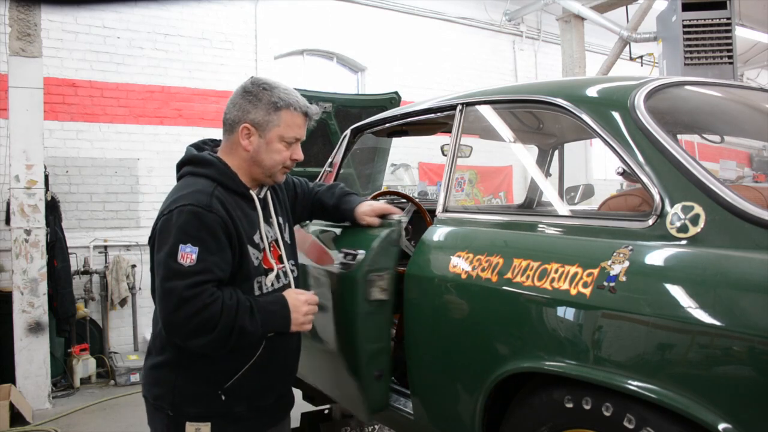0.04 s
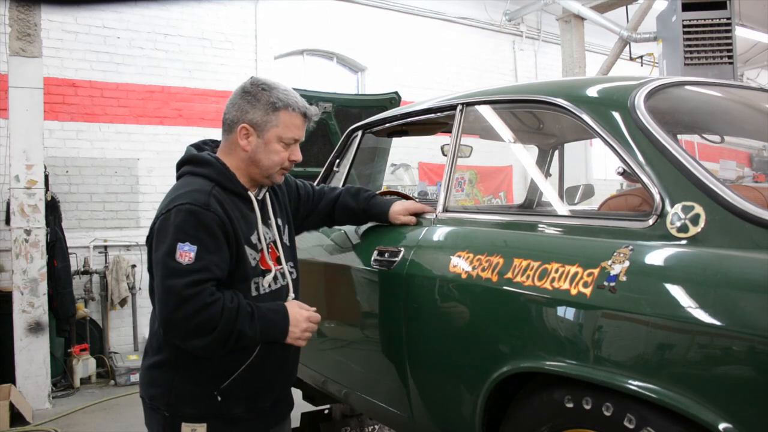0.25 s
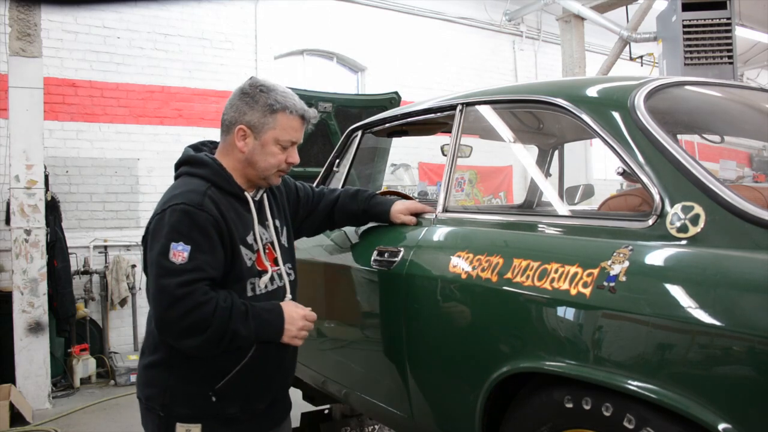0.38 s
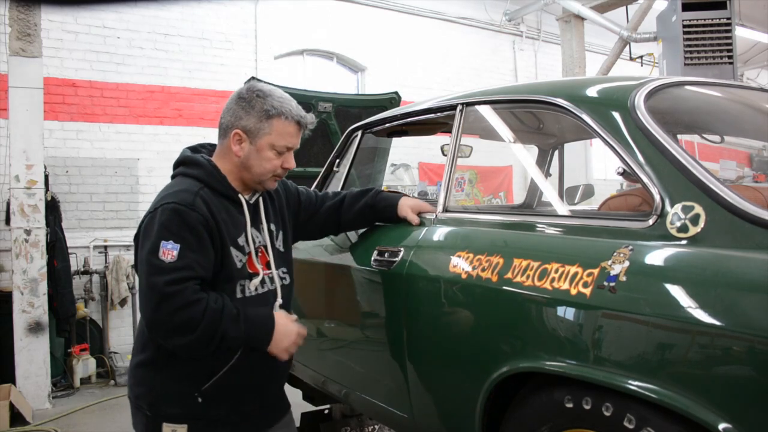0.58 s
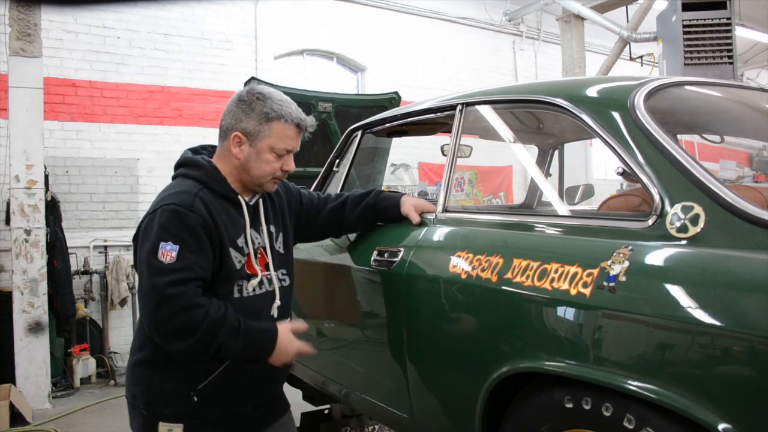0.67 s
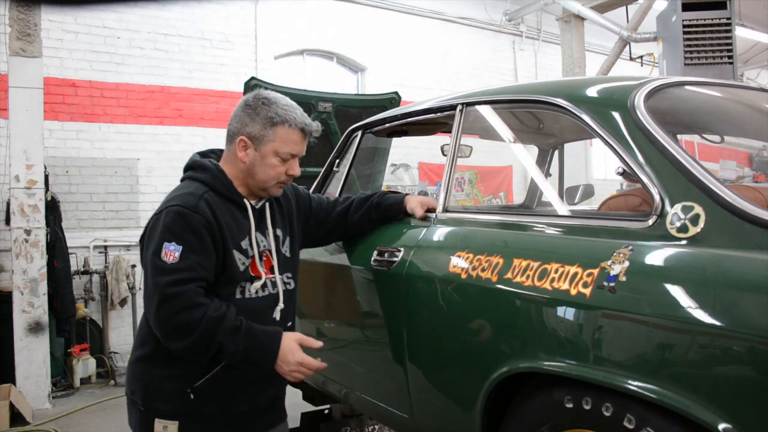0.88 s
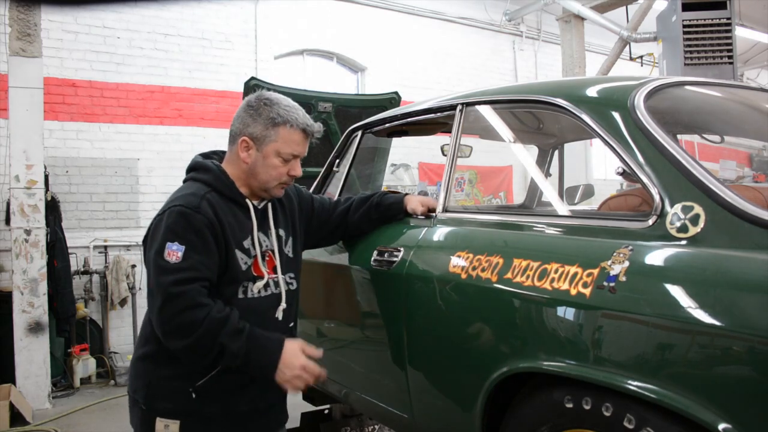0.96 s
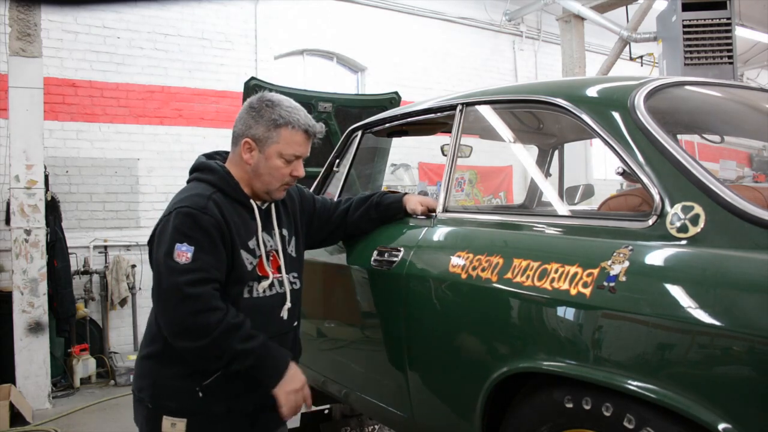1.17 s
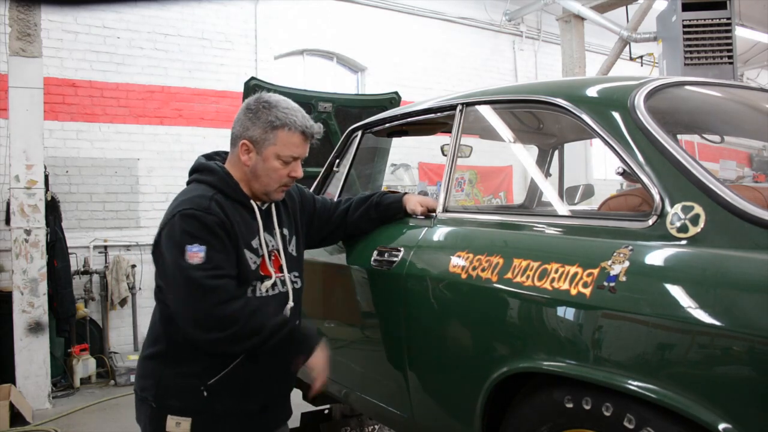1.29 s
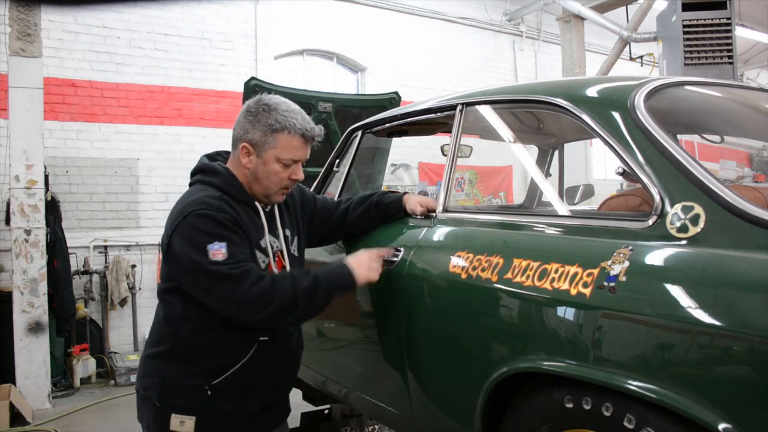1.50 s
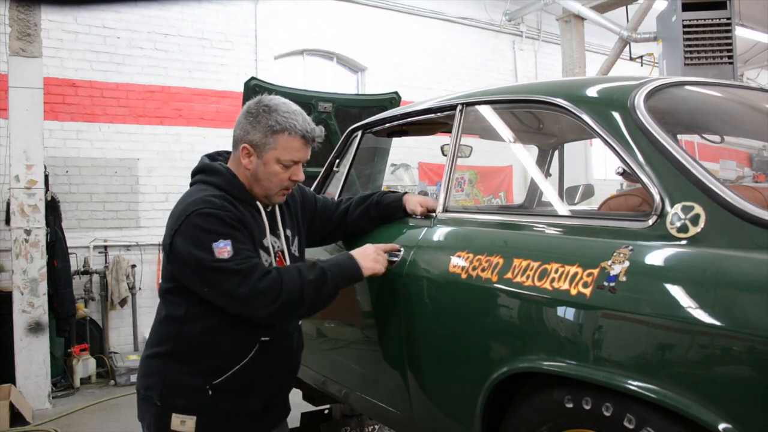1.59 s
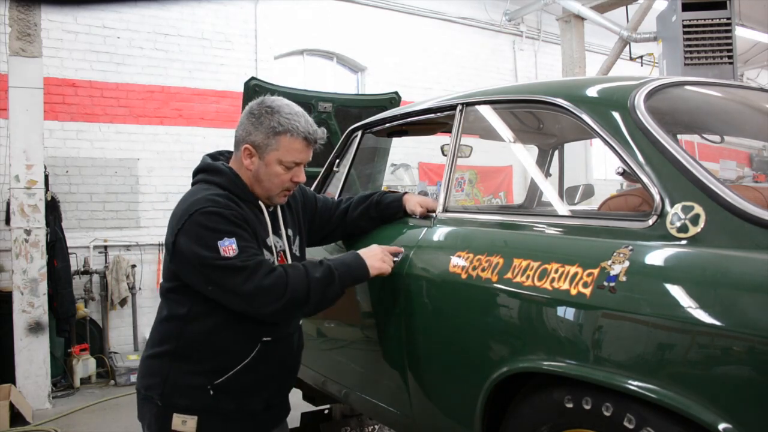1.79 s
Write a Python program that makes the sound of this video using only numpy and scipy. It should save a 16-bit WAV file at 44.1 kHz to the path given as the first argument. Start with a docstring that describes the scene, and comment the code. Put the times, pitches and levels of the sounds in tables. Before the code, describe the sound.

A heavy vintage car door slams once in a live brick workshop. A faint latch touch at 0.15 seconds, a sharp metallic crack at 0.21, then a thick, juddering sheet-metal thump with loose rattle until about 0.3. The roomy echo dies over roughly a second. Small clicks come from 0.6 to 1.4, a soft footfall near 1.1 and sleeve rustles to 1.7, over quiet air and hum.

```python
"""Car door slam in a brick workshop

An old car's steel door is slammed once: the latch touches, cracks over its striker, and the door judders in
its frame. Steel rings as decaying cosines; sheet metal, rattle and small clicks are shaped, dying noise.
The hall is a decaying stereo noise tail, and an automatic gain control ducks and recovers. Then come
small clicks, a soft footfall and a sleeve's rustle, over steady air noise and hum."""
import sys
import numpy as np
from scipy import signal
from scipy.fft import rfft, irfft, next_fast_len
from scipy.io import wavfile
from scipy.ndimage import minimum_filter1d

SR = 44100
rng = np.random.default_rng(int(sys.argv[2]) if len(sys.argv) > 2 else 0)


def file_out(sig):
    """Save sig as 16-bit WAV at sys.argv[1]."""
    # one column per channel
    cols = np.atleast_2d(sig).T
    # limit, then scale
    lim = np.clip(cols, -1, 1)
    pcm = np.round(lim * 32767).astype(np.int16)
    wavfile.write(sys.argv[1], SR, pcm)


N = 81585  # length in samples


def amp(db):
    """Decibels to gain."""
    return 10 ** (np.asarray(db) / 20)


def unit(x):
    """Scale to rms 1."""
    return x / np.sqrt(np.mean(x ** 2) + 1e-20)


def along(points, hz):
    """Read (Hz, value) points on a log frequency axis."""
    point_hz, values = np.transpose(points)
    return np.interp(np.log(hz + 1), np.log(point_hz + 1), values)


def since(start_s):
    """Seconds since start_s, zero before it."""
    return np.maximum(np.arange(N) / SR - start_s, 0)


def place(x, start_s):
    """Delay x to start at start_s."""
    delay = max(round(start_s * SR), 0)
    return np.pad(x, ((0, 0), (delay, 0)))[:, :N]


def filtered(x, response):
    """Multiply the spectrum of x by a response of frequency."""
    size = next_fast_len(N + SR // 2)
    hz = np.fft.rfftfreq(size, 1 / SR)
    return irfft(rfft(x, size) * response(hz), size)[..., :N]


def noise(spectrum, alike, tilt_db=0):
    """Stereo noise of rms 1 with a colour, a tilt in dB per octave and a left-right likeness."""
    def mid_side(hz):
        colour = amp(along(spectrum, hz) + tilt_db * np.log2(hz + 1))
        # sharing power between mid and side by this angle sets the correlation
        angle = np.arccos(np.clip(along(alike, hz), -1, 1)) / 2
        return colour * [np.cos(angle), np.sin(angle)]

    mid, side = filtered(rng.standard_normal((2, N)), mid_side)
    return unit(np.array([mid + side, mid - side]))


def fade(t, t60):
    """Exponential decay, down 60 dB after t60 seconds."""
    return np.exp(-np.log(1000) * t / t60)


def dying(x, t60s):
    """Let each frequency of x die at its own speed."""
    hz, t, bins = signal.stft(x, SR, nperseg=512)
    decay = fade(t, along(t60s, hz)[:, None])
    return signal.istft(bins * decay, SR, nperseg=512)[1][:, :N]


def ring(modes, start_s, attack_s, scatter_db=1):
    """Damped modes build up from rest, their levels scattered a little at each strike."""
    t = np.arange(N) / SR
    waves = 0
    for hz, db, t60 in modes:
        level = amp(db + scatter_db * rng.standard_normal())
        waves = waves + level * fade(t, t60) * np.cos(2 * np.pi * hz * t)
    return place(waves[None] * (1 - np.exp(-t / attack_s)), start_s)


# The workshop air at the microphone. Each row: frequency in Hz, relative level in dB per Hz.
AIR_SPECTRUM = [(25, -13), (60, -10.5), (110, -6), (180, -6.5), (260, -4.5), (400, -6), (800, -9.5),
                (1400, -15.5), (2500, -18.5), (7500, -23), (12500, -22), (16000, -26)]
# How alike the air is left and right. Each row: frequency in Hz, correlation from 0 to 1.
AIR_ALIKE = [(60, 0.4), (300, 0.2), (1500, 0.67), (10000, 0.16)]
# The hum of the shop's machines. Each row: frequency in Hz, level in dB rms.
HUM_TONES = [(59.4, -57), (241, -57.5), (786, -63.5)]


def background():
    """Steady coloured air noise, with sine tones for the hum of the shop's machines."""
    hum = 0
    for hz, db in HUM_TONES:
        phase = rng.random()  # in cycles
        hum = hum + amp(db) * np.sqrt(2) * np.sin(2 * np.pi * (hz * since(0) + phase))
    return amp(-46.5) * noise(AIR_SPECTRUM, AIR_ALIKE) + hum


# How long the brick hall rings on. Each row: frequency in Hz, t60 in seconds.
HALL_T60 = [(60, .9), (180, 1.0), (330, 1.23), (900, 1.25), (2000, 1.2), (4000, 1), (8000, 0.87),
            (15000, 0.58)]
# Colour of the hall. Each row: frequency in Hz, relative level in dB.
HALL_COLOUR = [(45, 8.5), (110, 9.5), (190, 2), (340, 3.5), (600, 1.5), (1200, 1), (2000, 1.5),
               (4000, -1.5), (7000, 1), (15000, -5.5)]
# How alike the hall is left and right. Each row: frequency in Hz, correlation from 0 to 1.
HALL_ALIKE = [(60, 0.87), (250, 0.59), (1000, 0.6), (4000, 0.15), (10000, .1)]
HALL_BUILD_S = 0.023
# the far wall sends back a soft swell, a bell curve in time
FAR_WALL_S, FAR_WALL_DB, FAR_WALL_SPREAD_S = 0.21, 2.5, 0.057


def hall(x):
    """The workshop's reverberation builds up, swells as the far wall answers, and dies slowly."""
    t = since(0)
    bell = np.exp(-((t - FAR_WALL_S) / FAR_WALL_SPREAD_S) ** 2 / 2)
    tail = dying(noise(HALL_COLOUR, HALL_ALIKE), HALL_T60)
    tail = tail * (1 - np.exp(-t / HALL_BUILD_S)) * amp(FAR_WALL_DB * bell)
    mono = x.mean(0)[None]
    return signal.fftconvolve(mono, tail / np.linalg.norm(tail), axes=1)[:, :N]


# A sleeve sweeps by. Each row: time of its peak in seconds, level in dB, half length in seconds.
SLEEVE_SWEEPS = [(0.99, -48, 0.051), (1.209, -49.5, 0.02), (1.366, -48.5, 0.054), (1.477, -55, 0.03),
                 (1.662, -47.5, .11)]
# Colour of the cloth. Each row: frequency in Hz, relative level in dB per Hz.
CLOTH_SPECTRUM = [(150, -34), (800, 3), (1600, 0.5), (2600, -0.5), (4500, -15), (12000, -23)]
# A soft footfall on the floor. Each row: frequency in Hz, level in dB, t60 in seconds.
STEP_MODES = [(89.5, 1, 0.087), (136, -4.5, 0.091), (241, 2, 0.062), (666, -7, 0.053)]
STEP_S, STEP_DB = 1.076, -29


def movement():
    """The man's sleeve is cloth noise swelling and fading; his foot is a few damped low modes."""
    t = since(0)
    sweep = 0
    for peak_s, db, half_s in SLEEVE_SWEEPS:
        sweep = sweep + amp(db) * np.exp(-((t - peak_s) / half_s) ** 2 / 2)
    rustle = sweep * noise(CLOTH_SPECTRUM, AIR_ALIKE)
    step = amp(STEP_DB) * ring(STEP_MODES, STEP_S, attack_s=0.0019)
    return rustle + step


# Small clicks at the car's side. Each row: start in seconds, level in dB,
# brightness in dB per octave, t60 in seconds.
CLICKS = [(.624, -28.5, -2.5, .05), (.855, -37, -2, 0.095), (.961, -36, -2, .1), (1.194, -52.5, 1, 0.12),
          (1.304, -42.5, -1, 0.14), (1.392, -36, 3.5, 0.068)]
# Colour of the clicks. Each row: frequency in Hz, relative level in dB per Hz.
CLICK_SPECTRUM = [(200, -4), (900, -2.5), (2000, -4), (2450, -14.5), (2900, 4), (3300, -8), (4100, -6),
                  (5000, -20), (6300, -9.5), (8000, -48), (15000, -33)]
# How alike direct sound is left and right. Each row: frequency in Hz, correlation from 0 to 1.
DIRECT_ALIKE = [(100, 0.91), (1000, 0.87), (3000, 0.89), (9000, 0.18)]


def clicks():
    """Short ticks of decaying noise with a colour peak near 3 kHz."""
    out = 0
    for start_s, db, tilt_db, t60 in CLICKS:
        tick = noise(CLICK_SPECTRUM, DIRECT_ALIKE, tilt_db) * fade(since(0), t60)
        out = out + place(amp(db) * tick, start_s)
    return out


# The latch at first touch. Each row: frequency in Hz, level in dB, t60 in seconds.
TOUCH_MODES = [(320, -5, 0.083), (505, -9, 0.062), (630, -9.5, 0.061), (1020, 0, 0.053), (1090, -6, 0.028),
               (1630, -10, 0.022)]
TOUCH_S, TOUCH_DB = 0.154, -22.5
# The latch snaps over the striker. Each row: start in seconds, level in dB.
SNAPS = [(0.208, -18), (0.21, -6), (0.2109, -26)]
# The latch steel. Each row: frequency in Hz, level in dB, t60 in seconds.
LATCH_MODES = [(1170, 0, 0.018), (1930, -20, 0.035), (2350, -1, 0.012), (3150, -3, 0.0087),
               (3480, -6, 0.014), (4180, -21, 0.015), (6400, -11.5, 0.0087), (7960, -18, 0.011),
               (10200, -19, 0.011)]
# Loose glass and linkage inside the door, a colour that the latch's crack shares.
# Each row: frequency in Hz, relative level in dB per Hz.
RATTLE_SPECTRUM = [(200, -53), (1200, 4.5), (2200, 1.5), (3600, 1.5), (4900, -5), (6600, -7), (8500, -15),
                   (15000, -30)]
CRACK_DB, CRACK_T60_S = -4, 0.0061
LATCH_HALL_DB = -4


def latch():
    """The latch rings at a soft touch, then snaps over the striker as steel modes and a noise crack."""
    touch = amp(TOUCH_DB) * ring(TOUCH_MODES, TOUCH_S, attack_s=0.0035)
    out = touch * np.ones((2, 1))  # same on both sides
    for start_s, db in SNAPS:
        crack = place(noise(RATTLE_SPECTRUM, DIRECT_ALIKE) * fade(since(0), CRACK_T60_S), start_s)
        steel = ring(LATCH_MODES, start_s, attack_s=0.00019)
        out = out + amp(db) * (steel + amp(CRACK_DB) * crack)
    return out + amp(LATCH_HALL_DB) * hall(out)


# The door lands in its frame and judders. Each row: start in seconds, sheet metal level in dB,
# rattle level in dB, panel thump level in dB.
BLOWS = [(.211, -16, -30, -17), (0.2334, -11.5, -23.5, -11.5), (.243, -6.5, -17.5, -9.5),
         (0.2514, -9.5, -19, -14), (.261, -10, -18, -15), (.279, -9.5, -21, -15)]
# Door skin and body shell. Each row: frequency in Hz, level in dB, t60 in seconds.
PANEL_MODES = [(55.9, -22, 0.74), (92, -13, 1), (150, -32, 0.55), (175.6, -8, 0.55), (223.1, -4.5, 0.2),
               (297.2, 3, 0.29), (331.2, -3, 0.23), (458, -5, 0.47), (499.3, -10, 0.47), (610, -16, 0.18),
               (904, -16, 0.66), (1250, -15, 0.25)]


def shell():
    """Every blow thumps the damped modes of the door skin and the body behind it."""
    return sum(amp(thump_db) * ring(PANEL_MODES, start_s, attack_s=0.0014)
               for start_s, _, _, thump_db in BLOWS)


# Crowded higher modes of the sheet metal. Each row: frequency in Hz, relative level in dB per Hz.
SHEET_SPECTRUM = [(20, -24), (45, -8.5), (90, -6.5), (170, -2), (320, 4.5), (450, 1.5), (800, -0.5),
                  (1300, -6), (2000, -13.5), (4000, -27.5), (15000, -41)]
# How long the sheet metal rings. Each row: frequency in Hz, t60 in seconds.
SHEET_T60 = [(60, 0.28), (400, 0.22), (1500, 0.11), (8000, 0.3)]
RATTLE_T60_S, RATTLE_GRAIN_S, RATTLE_ROUGH_DB = 0.2, 0.0022, 7
DOOR_HALL_DB = -0.5


def door():
    """Each blow shakes the sheet metal and the loose parts, and sets the hall ringing."""
    t = since(0)
    out = np.zeros((2, N))
    for start_s, sheet_db, rattle_db, _ in BLOWS:
        sheet = dying(noise(SHEET_SPECTRUM, DIRECT_ALIKE), SHEET_T60)
        sheet = sheet * (1 - np.exp(-t / 0.00033))
        # random levels, one per grain, make the rattle uneven
        grains = np.interp(t / RATTLE_GRAIN_S, np.arange(N), rng.standard_normal(N))
        chatter = unit(amp(RATTLE_ROUGH_DB * grains))
        rattle = noise(RATTLE_SPECTRUM, DIRECT_ALIKE) * chatter * fade(t, RATTLE_T60_S)
        blow = place(amp(sheet_db) * sheet + amp(rattle_db) * rattle, start_s)
        out += blow + amp(DOOR_HALL_DB) * hall(blow)
    return out


LATCH_PAN_DB = -2  # left minus right, for the latch and the clicks beside it
CLICK_HALL_DB = -4.5


def scene():
    """The slam and the small sounds after it, in the hall."""
    ticks = clicks()
    pan = amp(LATCH_PAN_DB * np.array([[0.5], [-0.5]]))
    slam = pan * (latch() + ticks) + door() + shell()
    tick_hall = amp(CLICK_HALL_DB) * hall(ticks)
    return slam + tick_hall + movement() + background()


LIMIT_DB, RECOVER_DB_PER_S, HOLD_S, ATTACK_S = -12.5, 26, 0.064, 0.0065
LOW_CUT_HZ, TOP_HZ = 40, 16300


def record(dry):
    """Gain control ducks on the slam, holds and creeps back; then the low cut and the band limit."""
    t = since(0)
    pole = np.exp(-1 / (ATTACK_S * SR))
    power = signal.lfilter([1 - pole], [1, -pole], np.mean(dry ** 2, 0))
    over_db = np.maximum(10 * np.log10(power + 1e-12) - LIMIT_DB, 0)
    # hold the largest excess of the last HOLD_S
    hold = 2 * int(HOLD_S * SR / 2) + 1
    held_db = -minimum_filter1d(-over_db, hold, origin=hold // 2, mode="constant")
    # let the ducking shrink no faster than the recovery speed
    recovery_db = RECOVER_DB_PER_S * t
    duck_db = np.maximum.accumulate(held_db + recovery_db) - recovery_db

    def band(hz):
        low_cut = -hz ** 2 / (LOW_CUT_HZ ** 2 - hz ** 2 + 1j * hz * LOW_CUT_HZ)
        return low_cut * (hz < TOP_HZ)

    return filtered(dry * amp(-duck_db), band)


dry = scene()
out = record(dry)
file_out(out)
```